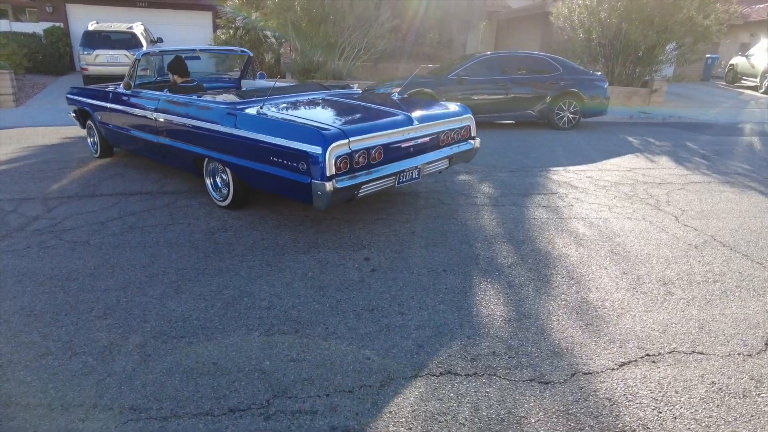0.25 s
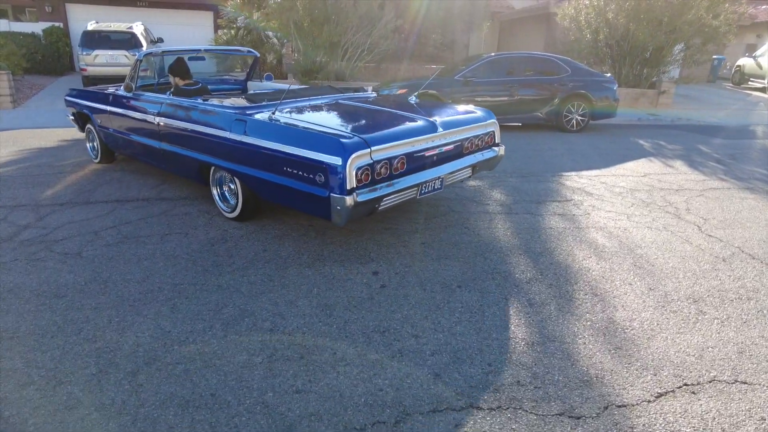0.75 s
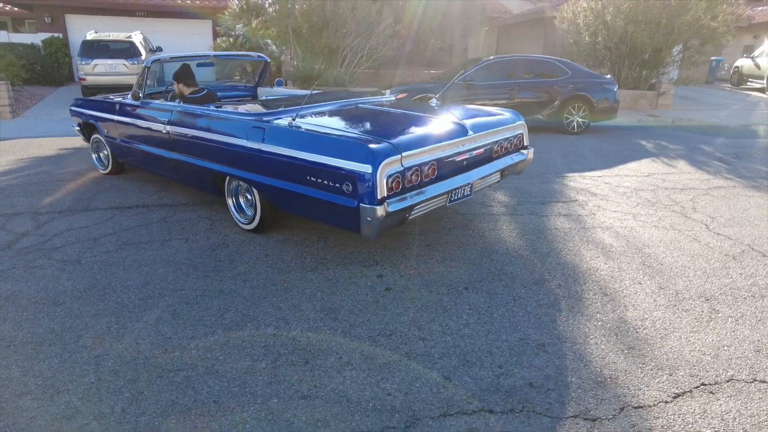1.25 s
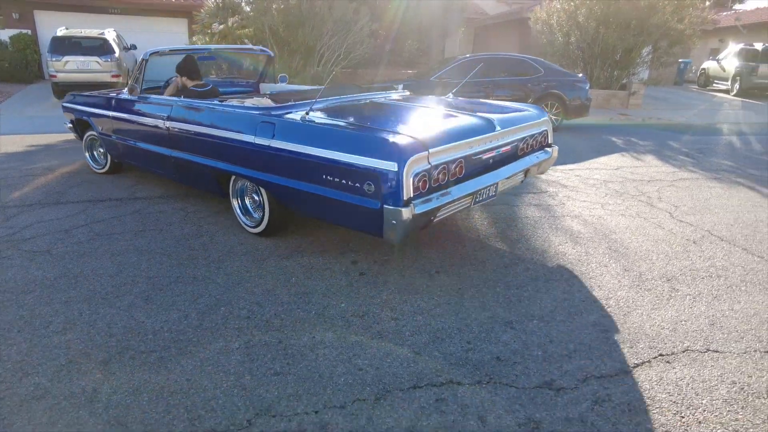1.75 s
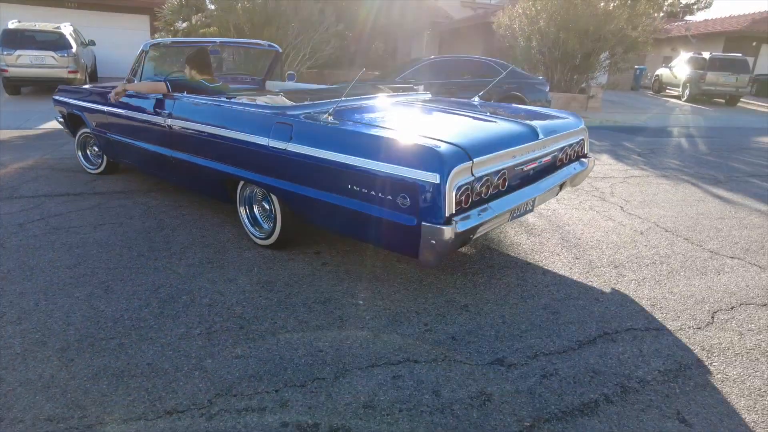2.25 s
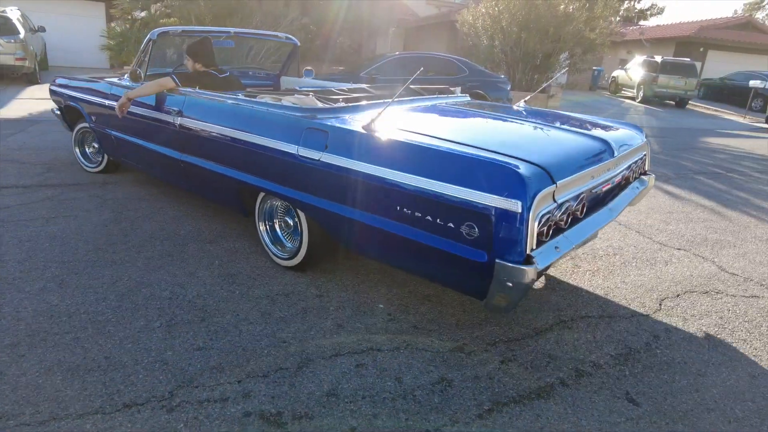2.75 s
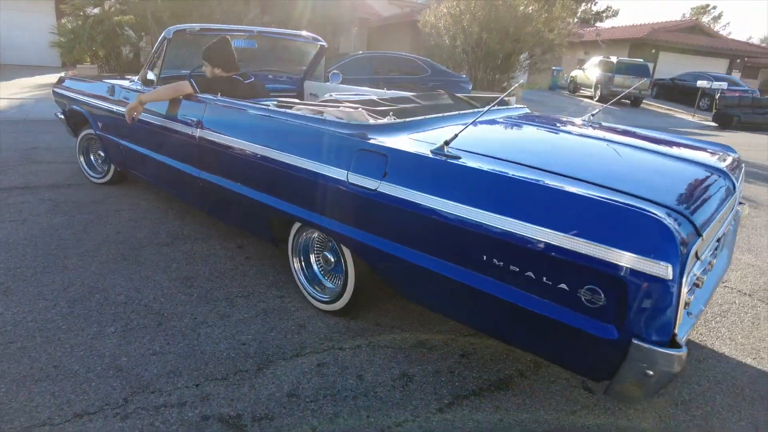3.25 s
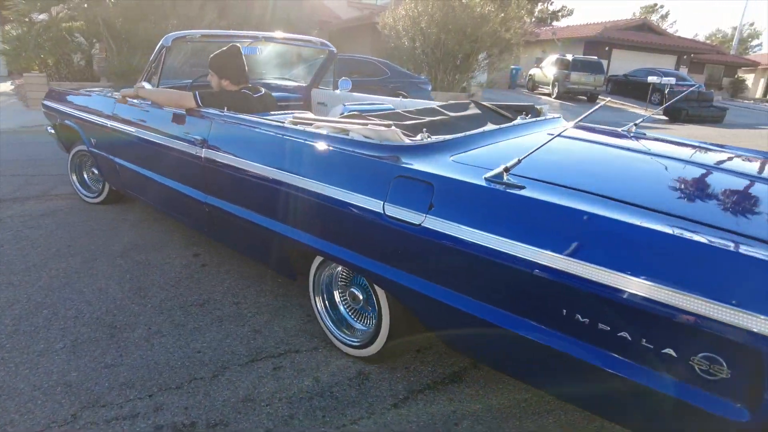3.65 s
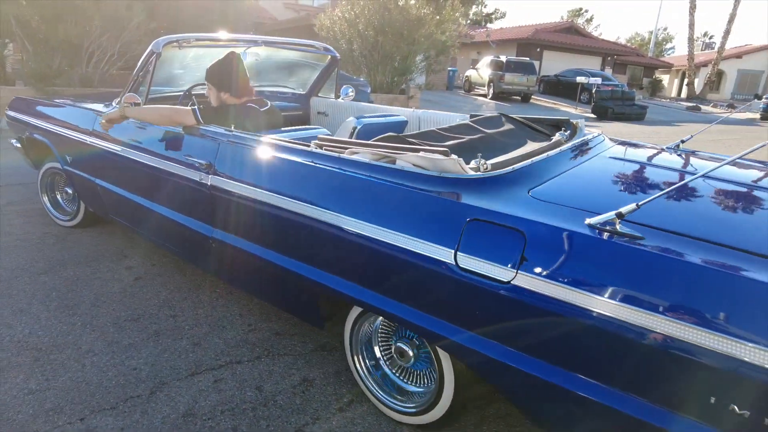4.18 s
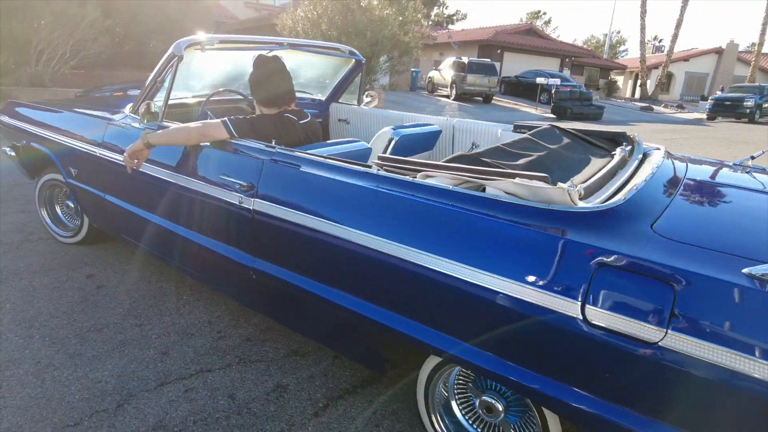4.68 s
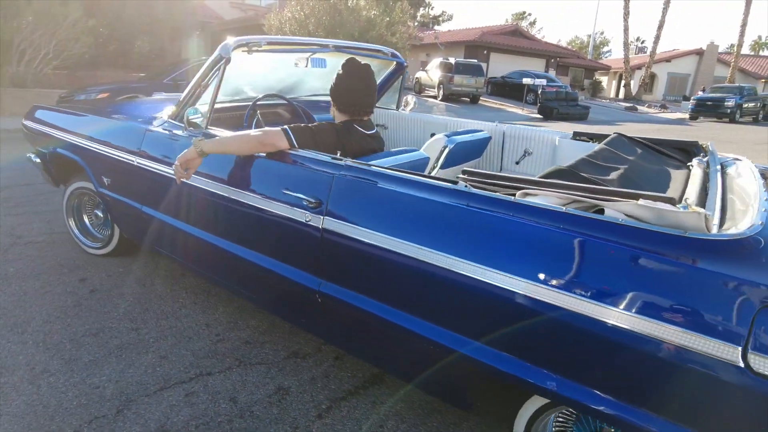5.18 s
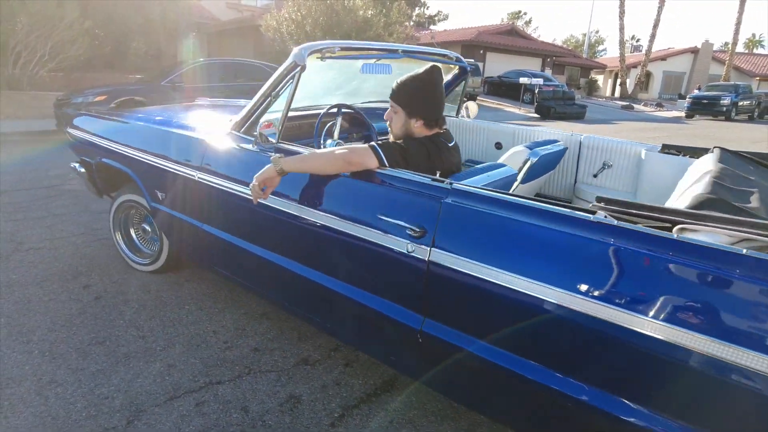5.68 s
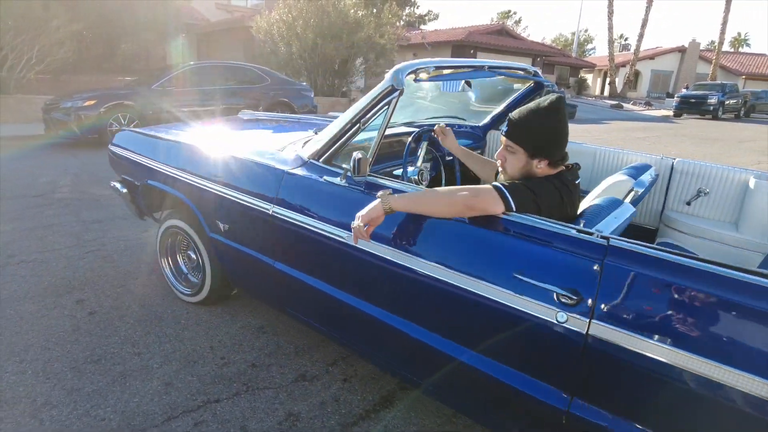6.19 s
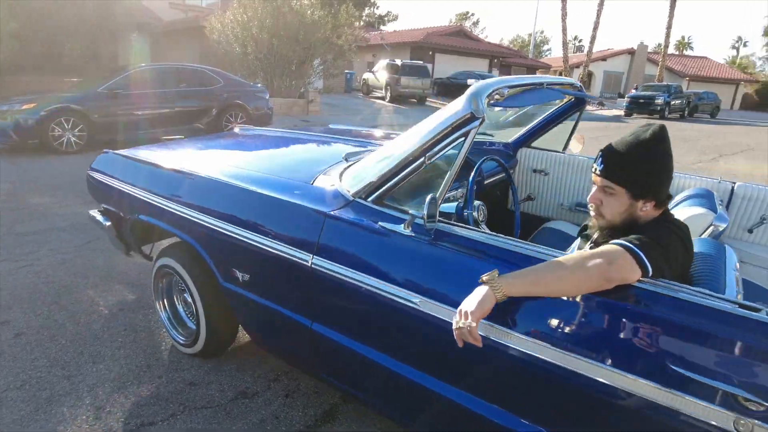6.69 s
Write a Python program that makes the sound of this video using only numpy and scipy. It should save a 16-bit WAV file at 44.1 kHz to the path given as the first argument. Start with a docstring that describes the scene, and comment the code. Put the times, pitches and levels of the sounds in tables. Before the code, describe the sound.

An old V8 convertible idles outdoors for about seven seconds with a deep, uneven, loping exhaust throb, heard close as the microphone moves from the tail to the side of the car. From about 0.8 seconds one blip of the throttle swells the engine into a louder drone, peaking around 1.5 seconds with a short hiss and faint raspy whistles of intake air. By 2 seconds it falls back to a chugging idle that wavers slightly in speed until the end. The exhaust burble is a little fuller from around 4 to 5.5 seconds, while a faint whirr, whine and ticking from the engine bay gradually brighten. Light, sharp clicks sound nearby at about 0.6, 2.7, 3.4, 5.2 and 6.2 seconds, the last the clearest. A soft rumble of open air lies underneath throughout.

```python
"""A deep, uneven throb: an old V8 convertible lopes at idle as the listener walks from tail to side.
Irregular firing pulses excite the resonances of the exhaust pipes; the engine bay whirrs and ticks.
One blip of the throttle swells the firing note into a drone over the lope, and turbulent air hisses
and whistles in the intake. A few light clicks sound nearby, above a soft rumble of open air."""
import sys
import numpy as np
from scipy import signal
from scipy.fft import rfft, irfft, next_fast_len
from scipy.io import wavfile

SR = 44100
rng = np.random.default_rng(int(sys.argv[2]) if len(sys.argv) > 2 else 0)


def store_pcm(level_fs):
    """Save levels as 16-bit WAV."""
    pcm = np.round(np.clip(level_fs, -1, 1) * 32767).astype(np.int16)
    wavfile.write(sys.argv[1], SR, np.atleast_2d(pcm).T)


N = 305613
TIME = np.arange(N) / SR
PADDED = next_fast_len(N + SR // 10, True)
FREQS = np.fft.rfftfreq(PADDED, 1 / SR)
IDLE_RPM, FULL_RPM = 582.4, 811

# Levels in the tables are relative. An order is a multiple of the four-stroke cycle rate.
# crankshaft speed, a hunting idle and one blip: t/s, speed/rpm
CRANK_SPEED = [(0.0, 598.7), (0.69, 604.0), (0.98, 768.7), (1.32, 820.6), (1.48, 956.7), (1.75, 941.2),
               (1.94, 670.1), (2.22, 624.3), (2.49, 696.9), (3.55, 691.4), (3.92, 633.5), (4.59, 672.4),
               (5.08, 656.4), (5.48, 700.6), (6.23, 622.2), (6.6, 682.5), (6.93, 686.6)]
# the listener's walk: t/s, place (0 behind the car, 1 beside it)
LISTENER_PLACE = [(0, 0.021), (2, 0.18), (3, 0.36), (4.3, 0.6), (6.3, 0.99), (6.93, 0.86)]
# the tailpipe comes near, then the body hides it: t/s, level/dB
TAILPIPE_LEVEL = [(0, -4.5), (0.35, -16.5), (0.75, -11), (2.05, -9), (2.5, -8.5), (3.2, -7), (4.2, -4),
                  (5.65, -5.5), (6.05, -8.5), (6.93, -12)]
# partials of the uneven firing: order, level/dB
LOPE_ORDERS = [(7, -42.5), (9, -12.5), (10, -13.5), (11, 4), (12, -5), (13, -10)]
# cylinders in firing order: level/dB, lateness/firing interval
FIRINGS = [(-3, 0.025), (-2.5, -0.042), (1.5, 0.148), (4.5, -0.081), (-0.5, -0.102), (3, -0.245),
           (3, 0.381), (-0.5, -0.074)]
# exhaust resonances: f/Hz, width/Hz, level behind/dB, level beside/dB
PIPE_MODES = [(81, 54, -14, -13), (111.4, 25.4, -1, 1.5), (158.7, 27, -7, -13), (217, 33.3, -6, -8.5),
              (253.3, 35, -10.5, -4.5), (274.4, 6.6, -20.5, -10.5), (328, 6.1, -31.5, -10.5),
              (364, 22, -12.5, -19), (418, 16, -8, -20.5), (478.7, 40.5, -17, -10.5), (532, 29, -13, -47)]
# standing waves in the pipe: f/Hz, width/Hz, level/dB, loudest place, reach in place, delay/cycle
STANDING_WAVES = [(110.6, 15.6, -33, .35, 1, 0.119), (155.6, 15.7, -36, 0.2, 0.44, 0.1386),
                  (161.8, 8.2, -38, 1, 0.067, 0.141), (210.4, 15, -37, 0.81, 0.27, .3),
                  (240.8, 13.7, -45, 0.66, 0.26, .3), (273.1, 16.6, -42, .4, 0.37, .3),
                  (324, 12.7, -40, 1, .22, .3), (361.7, 12, -46.5, 0.28, 0.13, .3)]
# harmonics that drive the standing waves: order, level/dB
HUM_ORDERS = [(16, -14), (18, -6), (19, -5.5), (20, 0), (21, 1), (22, -5.5), (23, -6.5), (24, -5.5),
              (27, -.5), (28, 3), (30, -11.5), (31, -9.5), (32, -10.5), (36, -6.5), (40, 0.5), (42, -8),
              (43, 1.5), (44, -2), (48, 1), (52, -7), (56, -9), (57, 0), (58, -3), (61, -2.5), (62, -6.5),
              (63, -5.5), (65, -7.5)]
# fan and belt noise: f/Hz, spectral level/dB
BAY_SPECTRUM = [(100, -3.5), (300, 11.5), (560, 7.5), (760, 10.5), (900, 4.5), (1280, 4.5), (1650, 4),
                (2000, -1), (3000, -4), (3700, -11), (6000, -18.5), (7800, -23), (9500, -25),
                (15500, -33.5)]
# panel and accessory resonances: f/Hz, width/Hz, level/dB
BAY_MODES = [(1313, 10, 5.5), (2090, 59, 4.5), (4150, 570, 3), (7710, 350, 5), (12450, 260, 5.5)]
# noise bands of the engine bay: start/s, end/s, first f/Hz, last f/Hz, width/Hz, level/dB
WHINE_BANDS = [(-.6, 1.5, 480, 490, 140, -50.5), (2.7, 4.7, 496, 472, 24, -48),
               (1.5, 5.7, 740, 740, 65, -52.5), (4, 7, 735, 740, 56, -51), (6, 6.85, 810, 600, 51, -51.5),
               (6.65, 7.05, 570, 630, 45, -48), (6, 6.85, 500, 405, 36, -47.5),
               (4.9, 6.8, 1830, 1450, 380, -51), (3.6, 8, 1220, 1320, 61, -56.5),
               (1.8, 4.4, 940, 1010, 220, -56), (4.1, 6, 425, 420, 26, -50)]
# the gulp of air at the blip: t/s, level/dB
INTAKE_LEVEL = [(1.2, -68.5), (1.244, -65), (1.262, -49.5), (1.296, -54.5), (1.325, -41.5), (1.48, -37.5),
                (1.55, -41.5), (1.605, -47), (1.65, -55), (1.768, -69), (1.78, -77)]
# intake turbulence: f/Hz, spectral level/dB
INTAKE_SPECTRUM = [(400, -3.5), (900, 5.5), (1500, 7), (2100, -0.5), (3300, 4), (4500, 3), (6000, 3),
                   (7600, -3.5), (9000, -7), (11000, -13.5), (15500, -22.5)]
# air cleaner resonances: f/Hz, width/Hz, level/dB
AIR_CLEANER_MODES = [(1630, 74, -6), (1910, 57, 7.5), (2400, 53, 5), (2565, 45, 8.5), (3600, 100, -7),
                     (4330, 77, 3), (5200, 280, 2), (6230, 270, -6.5), (7620, 240, -2.5)]
# whistles at the throttle plate: centre t/s, f/Hz, level/dB, length/s, glide/(Hz/s)
EDGE_TONES = [(1.132, 2480, -42, 0.043, 3996), (1.277, 2170, -39.5, 0.046, -2500),
              (1.333, 2960, -44, 0.05, -5000), (1.41, 1740, -38.5, 0.051, -1500),
              (1.448, 4150, -38, 0.027, 9000), (1.453, 2530, -38, 0.028, 0), (1.459, 1588, -32, 0.053, 501),
              (1.47, 5360, -40, .025, 6000), (1.492, 6040, -38, .025, 7999), (1.532, 7530, -47, 0.072, -2),
              (1.549, 4440, -45, 0.03, -4000), (1.551, 5100, -44, 0.049, 4997),
              (1.605, 2186, -39, 0.12, -2500)]
# light clicks: t/s, rattle level/dB, contact level/dB, f/Hz, width/octaves, t60/s
IMPACTS = [(.11, -56, -45, 6500, 0.31, .03), (.549, -52, -46, 6000, 0.51, 0.11),
           (.566, -48, -44, 3500, 0.73, 0.16), (.597, -42, -34, 2270, 0.42, .02),
           (0.601, -45, -16, 2200, 0.52, .02), (0.612, -46, -33, 2700, .68, .02),
           (2.648, -56, -35, 7000, 1, 0.012), (2.6506, -36.5, -15, 2900, 1.06, .011),
           (2.657, -41, -28, 2800, 0.96, .01), (2.659, -40, -26, 850, 0.79, .09),
           (3.352, -41, -11.5, 1420, 0.21, 0.024), (3.355, -41, -29, 2200, 1.2, .015),
           (3.432, -45, -25, 6000, 0.73, .02), (3.436, -39.5, -27, 3800, 0.82, .025),
           (3.452, -56, -38, 12500, .15, .02), (3.57, -49.5, -36, 4000, 0.87, 0.15),
           (3.585, -50, -36, 3480, 0.78, 0.08), (5.1557, -35, -30, 1300, 1.14, 0.031),
           (5.1688, -47, -19, 1100, 0.57, 0.018), (5.174, -42, -22, 1050, 0.47, .025),
           (6.159, -35, -13, 2600, 0.8, 0.028), (6.1697, -30.5, -8.5, 2130, 0.58, 0.06),
           (6.188, -41, -26, 2300, 0.87, .025)]
# likeness of left and right: f/Hz, coherence
COHERENCE = [(50, 0.94), (200, 0.92), (350, 0.7), (600, 1), (800, 0.39), (1080, 0.054), (1250, 0.8),
             (1700, 0.87), (2200, 0.27), (2900, 0.21), (3500, 0.24), (4250, 0.38), (5200, 0.068),
             (15000, 0.1)]
# left minus right: f/Hz, level/dB
LEFT_EXCESS = [(60, -1.2), (200, 0), (500, .7), (1000, .1), (4000, 1.8), (14000, 1.4)]
# lead of left over right: f/Hz, phase/rad
LEFT_LEAD = [(60, 0.13), (300, 0.01), (440, 0.73), (600, 0.96), (750, 1.4), (1080, 1.2), (1260, 0.67),
             (1950, 1.02), (2500, 1.2), (4400, 2.56), (6500, 3.44), (9000, 2), (15000, 5.7)]


def engine_cycles(start=0.301):
    """Phase is the integral of speed: the count of four-stroke cycles, each two crankshaft turns."""
    return start + np.cumsum(curve(CRANK_SPEED)) / (2 * 60 * SR)


def boom(cycles, lope_db=-16, blur_db=-12.5, blur_hz=55, stumble_cycles=0.00076):
    """Neighbouring orders beat to make the lope; the firing note swells with speed and throttle."""
    pull = effort(curve(CRANK_SPEED))
    angle = 2 * np.pi * (cycles + stumble_cycles * wander(0.36))
    note = np.cos(8 * angle) + amp(-29 + 12 * pull) * np.sin(16 * angle)  # eight firings a cycle
    swell_db = 11 * pull + 8.5 * effort(demand_rpm()) + wander(23)
    note *= amp(swell_db) * pipe_gain(level_db=-26, db_per_rpm=-0.0011, nearness=0.42)
    lope = sum(amp(db) * np.cos(round(order) * angle) for order, db in LOPE_ORDERS)
    # no two cycles burn alike: a soft blur fills the dips between the chugs
    lope += amp(blur_db) * noise_band(2 * np.pi * blur_hz * TIME, half_width_hz=14)
    lope *= amp(lope_db + curve(TAILPIPE_LEVEL) + wander(46))
    return np.sqrt(2) * (note + lope)


def firing_pulses(cycles, jitter=0.012, uneven_db=1.5):
    """Each cylinder releases an impulse; unequal strength and spacing modulate the train every cycle."""
    firing = np.arange(int(cycles[-1] + 1) * len(FIRINGS))
    strength_db, late = np.asarray(FIRINGS)[firing % len(FIRINGS)].T
    timing_error, strength_error = rng.standard_normal((len(firing), 2)).T
    due_cycle = (firing + late + jitter * timing_error) / len(FIRINGS)
    sample = np.interp(due_cycle, cycles, np.arange(N), left=-1, right=-1)
    strength = amp(strength_db + uneven_db * strength_error)
    return np.bincount(sample[sample >= 0].astype(int), strength[sample >= 0], N)


def exhaust(cycles, puff_s=0.018, gas_ratio=0.6, gassy_hz=430, split_hz=195):
    """Source and filter: each firing drives the pipe resonances with a pulse and a turbulent puff."""
    pulses = firing_pulses(cycles)
    puff_envelope = signal.lfilter([1], [1, -np.exp(-1 / (puff_s * SR))], pulses)
    puffs = unit_rms(puff_envelope * rng.standard_normal((2, N)))
    # the higher the frequency, the more of each pulse is broken up into gas noise
    clean = lowpass(gassy_hz, 8)
    thumps = filtered(unit_rms(pulses), np.sqrt(clean))
    gas = filtered(puffs[0], np.sqrt(gas_ratio ** 2 + 1 - clean))
    drive = muffler(stereo(thumps + gas, puffs[1]))
    place, pipe = curve(LISTENER_PLACE), 0
    for hz, width, behind_db, beside_db in PIPE_MODES:
        ring = filtered(drive, resonance(hz, width, steepen=0.73))
        pipe += ring * amp(behind_db + place * (beside_db - behind_db))
    low = lowpass(split_hz, 12)
    throb = unit_rms(filtered(pipe, low), band_hz=(95, 190))
    burble = unit_rms(filtered(pipe, 1 - low), band_hz=(200, 560))
    return (throb * pipe_gain(level_db=-34.5, db_per_rpm=0.0256, nearness=0.085)
            + burble * pipe_gain(level_db=-38.5, db_per_rpm=0.0136, nearness=0.52))


def muffler(x, smear=6):
    """Dispersion: the silencer's chambers delay low frequencies most, rounding each pulse."""
    return filtered(x, np.exp(-1j * smear * np.log(FREQS + 1)))


def pipe_hums(cycles, waver_db=2, stumble_cycles=0.0023, away_db=-9):
    """Forced resonance: an engine order sings out as it passes through a standing wave's frequency."""
    angle = 2 * np.pi * (cycles + stumble_cycles * wander(3))
    phase = np.linspace(0, 2 * np.pi, 4096, endpoint=False)
    one_cycle = np.sqrt(2) * sum(amp(db) * np.cos(round(order) * phase) for order, db in HUM_ORDERS)
    place, out = curve(LISTENER_PLACE), 0
    for hz, width, db, loudest_place, reach, delay in STANDING_WAVES:
        tones = np.interp(angle - 2 * np.pi * delay, phase, one_cycle, period=2 * np.pi)
        hum = filtered(tones, resonance(hz, width, steepen=1))
        away = 1 - np.exp(-((place - loudest_place) / reach) ** 2)
        out += hum * amp(db + away_db * away + waver_db * wander(8.5))
    return out * pipe_gain(level_db=-1, db_per_rpm=0.01, nearness=0.11)


def engine_bay(cycles, tick_depth=0.14, tick_share=0.092, flutter_db=0.97, split_hz=3800):
    """Amplitude modulation: sixteen tapping valves roughen fan and belt noise, brighter at the side."""
    taps = cycles * 2 * len(FIRINGS)
    force = rng.exponential(1, 2000)[taps.astype(int)]
    ticks = tick_depth * force * np.exp(-(taps % 1) / tick_share)
    envelope = (1 + ticks) * amp(flutter_db * wander(19))
    noise = stereo(*(envelope * rng.standard_normal((2, N))))
    modes_db = sum(db / (1 + (2 * (FREQS - hz) / width) ** 2) for hz, width, db in BAY_MODES)
    air = filtered(noise, amp(spectrum(BAY_SPECTRUM) + modes_db))
    low = lowpass(split_hz, 4)
    whirr = filtered(unit_rms(air, band_hz=(900, 3000)), low)
    fizz = filtered(unit_rms(air, band_hz=(4500, 14000)), 1 - low)
    place, throttle_db = curve(LISTENER_PLACE), 4 * effort(demand_rpm())
    return (whirr * amp(-53 + 6 * place) + fizz * amp(-64.5 + 12 * place)) * amp(throttle_db)


def bay_whines(spread=0.34, patchy_db=2.5):
    """Narrow-band noise has a fuzzy pitch: each band swells, glides slowly and fades unevenly."""
    out = np.zeros((2, N))
    for start, end, first_hz, last_hz, width, db in WHINE_BANDS:
        angle = 2 * np.pi * np.cumsum(np.interp(TIME, [start, end], [first_hz, last_hz])) / SR
        mid = noise_band(angle, width / 2)
        side = spread * noise_band(angle, width / 2)
        swell = np.sin(np.pi * np.clip((TIME - start) / (end - start), 0, 1))
        out += np.array([mid + side, mid - side]) * swell * amp(db + patchy_db * wander(7))
    return out


def intake(cycles, level_db=1.2, gulp_depth=0.2, drift=0.035, ring_db=-16.5, flicker_db=4, fade_s=0.072):
    """Turbulence at the open throttle pulses at the firing rate and excites the air cleaner's modes."""
    gulps = 1 + gulp_depth * np.cos(2 * np.pi * (len(FIRINGS) * cycles - 0.25))
    gulps *= amp(-0.4 * wander(120))
    rush = stereo(*rng.standard_normal((2, N)))
    air = unit_rms(filtered(rush, amp(spectrum(INTAKE_SPECTRUM))))
    for hz, width, db in AIR_CLEANER_MODES:
        ring = unit_rms(filtered(rush, 1 / (1 + 2 * ((FREQS - hz) / width) ** 2)))
        # each mode drifts in pitch and flares up on its own
        warped_time = TIME + drift * np.cumsum(wander(12)) / SR
        ring = np.array([np.interp(warped_time, TIME, channel) for channel in ring])
        air += ring * amp(db + ring_db + flicker_db * wander(20))
    opens, closes = INTAKE_LEVEL[0][0], INTAKE_LEVEL[-1][0]
    fade = np.clip(np.minimum(TIME - opens, closes - TIME) / fade_s, 0, 1)
    return unit_rms(air * gulps, band_hz=(3000, 12000)) * fade * amp(curve(INTAKE_LEVEL) + level_db)


def throttle_whistles(level_db=-3, octave_db=-15, rasp_hz=180):
    """Edge tones: air meeting the throttle plate gives brief, raspy whistles that glide in pitch."""
    rasp = np.array([wander(rasp_hz) + 1j * wander(rasp_hz) for _ in range(2)])
    out = np.zeros((2, N))
    for centre, hz, db, length, glide in EDGE_TONES:
        near = abs(TIME - centre) < 2 * length
        t = TIME[near] - centre
        phasor = np.exp(2j * np.pi * (hz * t + glide * t ** 2 / 2))
        tone = (rasp[:, near] * (phasor + amp(octave_db) * phasor ** 2)).real
        out[:, near] += tone * amp(db + level_db) * np.exp(-(2 * t / length) ** 2)
    return stereo(*out)


def clicks(spread=0.089):
    """Impact excitation: a sharp contact and an exponentially damped rattle ring in one band."""
    grit, out = stereo(*rng.standard_normal((2, N))), np.zeros((2, N))
    for onset, rattle_db, contact_db, hz, octaves, t60 in IMPACTS:
        band = unit_rms(np.exp(-0.5 * (np.log2((FREQS + 1) / hz) / octaves) ** 2))
        start = round(onset * SR)
        t = TIME[:min(SR // 4, N - start)]
        span = slice(start, start + len(t))
        hit = grit[:, span] * amp(rattle_db) * np.exp(-np.log(1000) * t / t60)
        hit[:, 0] += amp(contact_db) * np.array([1 + spread / 2, 1 - spread / 2])
        out[:, span] += signal.fftconvolve(hit, minimum_phase(band)[None])[:, :len(t)]
    return out


def air_rumble(level_db=-40, corner_hz=34):
    """Slow pressure fluctuations of the open air are heard as a soft rumble."""
    return amp(level_db) * wander(corner_hz)


def demand_rpm(flywheel_lag_s=0.15):
    """Inertia: the throttle asks for a speed that the crankshaft reaches a moment later."""
    return np.interp(TIME + flywheel_lag_s, *np.transpose(CRANK_SPEED))


def effort(rpm):
    """Normalised speed: 0 at idle, 1 when pulling."""
    return np.clip((rpm - IDLE_RPM) / (FULL_RPM - IDLE_RPM), 0, 1)


def pipe_gain(level_db, db_per_rpm, nearness):
    """Gains add in decibels: one term follows the throttle, one the tailpipe's nearness."""
    return amp(level_db + db_per_rpm * (demand_rpm() - IDLE_RPM) + nearness * curve(TAILPIPE_LEVEL))


def amp(db):
    """Amplitude ratio of a level in decibels."""
    return 10 ** (np.asarray(db) / 20)


def curve(rows):
    """Linear interpolation of a time table at every sample."""
    return np.interp(TIME, *np.transpose(rows))


def spectrum(rows):
    """Interpolation of a frequency table on a logarithmic axis."""
    hz, value = np.transpose(rows)
    return np.interp(np.log(FREQS + 1), np.log(hz), value)


def filtered(x, gain):
    """Linear filtering multiplies the spectrum by a gain."""
    return irfft(rfft(x, PADDED) * gain, PADDED)[..., :N]


def lowpass(corner_hz, power):
    """Gain that falls as a power of frequency above the corner."""
    return 1 / (1 + (FREQS / corner_hz) ** power)


def resonance(hz, width, steepen):
    """Response of a damped oscillator, its flanks steepened to deepen the valleys between modes."""
    response = 1 / (1 + 1j * (FREQS ** 2 - hz ** 2) / (width * FREQS + 1e-9))
    return response * abs(response) ** steepen


def minimum_phase(gain, size=2048):
    """Causal impulse response of a magnitude spectrum: a sharp attack, then ringing."""
    gain = np.interp(np.fft.rfftfreq(size, 1 / SR), FREQS, gain)
    log_gain = np.log(np.maximum(gain, 1e-4))
    phase = -signal.hilbert(np.r_[log_gain, log_gain[-2:0:-1]]).imag[:len(gain)]
    return irfft(gain * np.exp(1j * phase))


def unit_rms(x, band_hz=None):
    """Normalisation to rms 1, overall or within a band."""
    part = x if band_hz is None else filtered(x, (FREQS > band_hz[0]) & (FREQS < band_hz[1]))
    return x / np.sqrt(np.mean(part ** 2) + 1e-20)


def wander(rate_hz, hop=16):
    """Low-passed Gaussian noise: a random fluctuation of rms 1."""
    steps = np.arange(0, N + hop, hop)
    hz = np.fft.rfftfreq(len(steps), hop / SR)
    slow = irfft(rfft(rng.standard_normal(len(steps))) / (1 + (hz / rate_hz) ** 4), len(steps))
    return unit_rms(np.interp(np.arange(N), steps, slow))


def noise_band(angle, half_width_hz):
    """Random quadrature modulation spreads a tone into a narrow band."""
    return wander(half_width_hz) * np.cos(angle) + wander(half_width_hz) * np.sin(angle)


def stereo(direct, scattered):
    """Partial coherence: left and right share the bass and differ in the treble."""
    alike = np.clip(spectrum(COHERENCE), -0.99, 1)
    mid = filtered(direct, np.sqrt((1 + alike) / 2))
    side = filtered(scattered, np.sqrt((1 - alike) / 2))
    return np.array([mid + side, mid - side])


def scene():
    """Superposition of tailpipe, engine front and background; one crankshaft times the pulsations."""
    cycles = engine_cycles()
    tailpipe = boom(cycles) + exhaust(cycles) + pipe_hums(cycles)
    front = engine_bay(cycles) + bay_whines() + intake(cycles) + throttle_whistles()
    return tailpipe + front + clicks() + air_rumble()


def record(dry):
    """Level and phase differences between left and right give direction; a low-pass limits the band."""
    sides = np.array([[0.5], [-0.5]])
    response = amp(sides * spectrum(LEFT_EXCESS)) * np.exp(1j * sides * spectrum(LEFT_LEAD))
    band_limit = signal.firwin(511, cutoff=15750, window=("kaiser", 9), fs=SR)
    return signal.oaconvolve(filtered(dry, response), band_limit[None], "same")


dry = scene()
out = record(dry)
store_pcm(out)
```